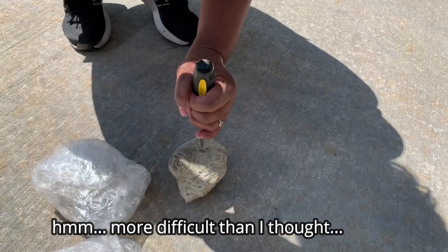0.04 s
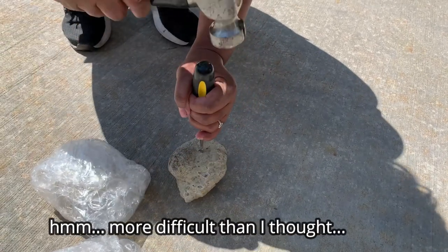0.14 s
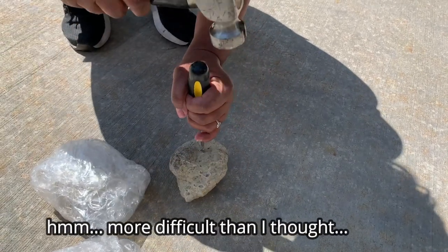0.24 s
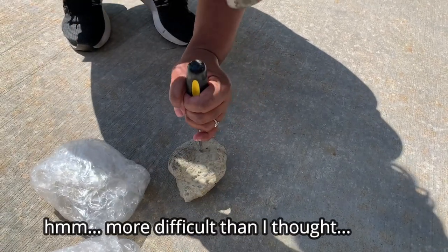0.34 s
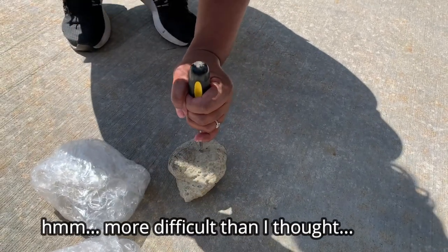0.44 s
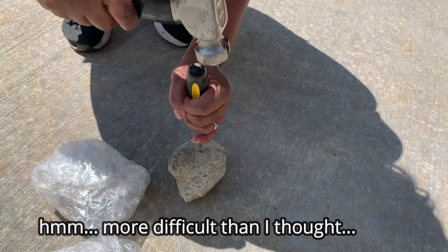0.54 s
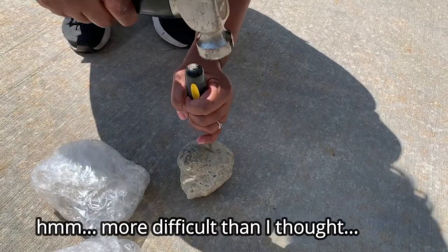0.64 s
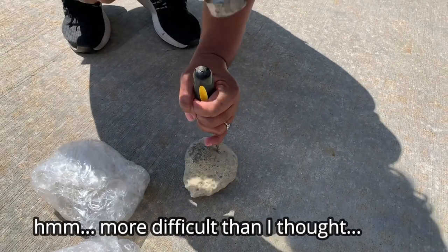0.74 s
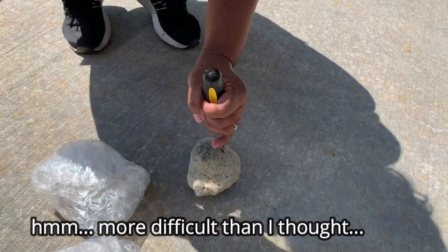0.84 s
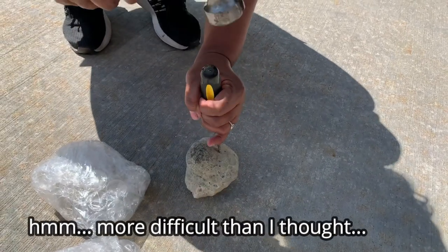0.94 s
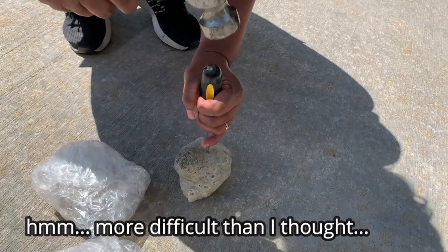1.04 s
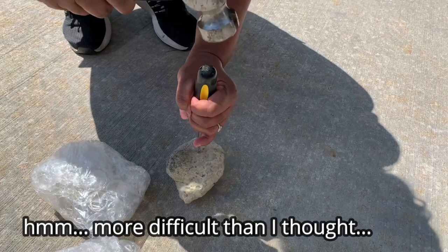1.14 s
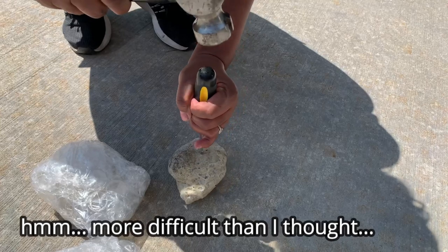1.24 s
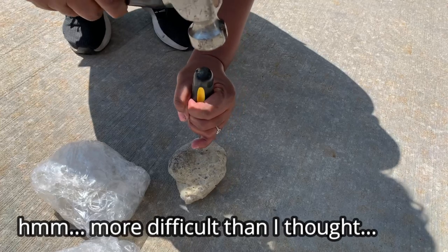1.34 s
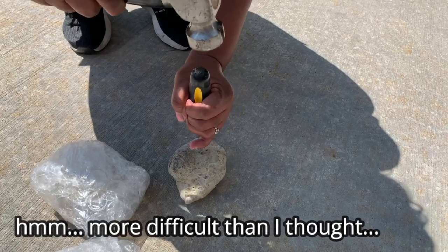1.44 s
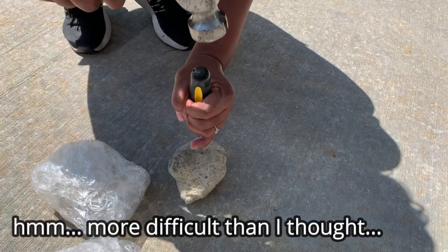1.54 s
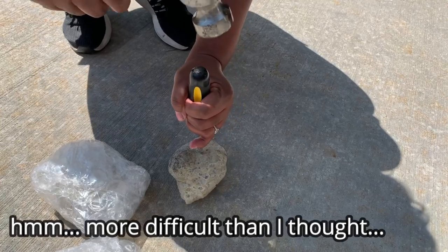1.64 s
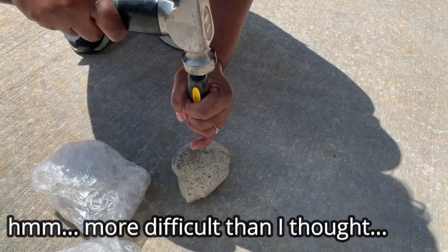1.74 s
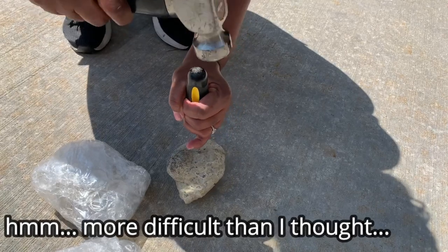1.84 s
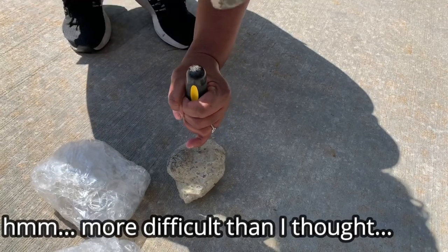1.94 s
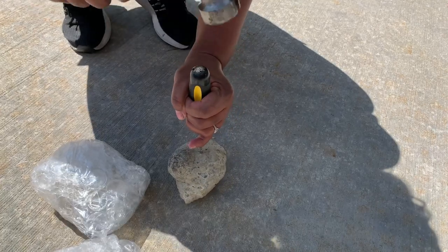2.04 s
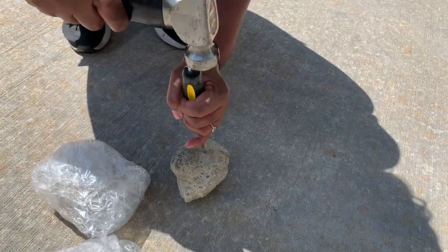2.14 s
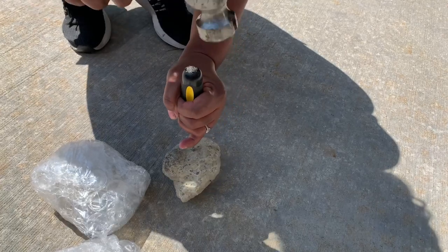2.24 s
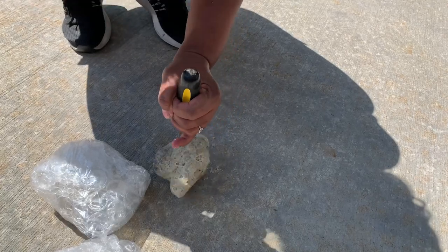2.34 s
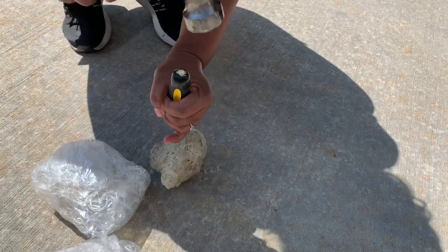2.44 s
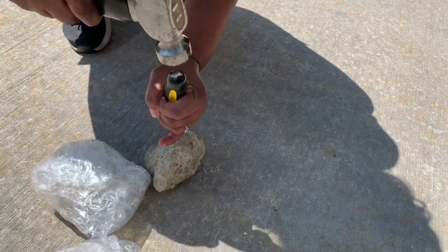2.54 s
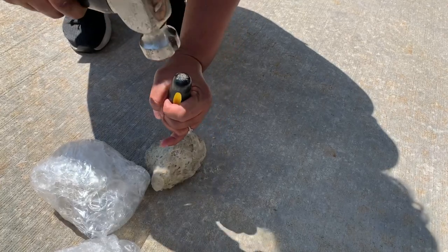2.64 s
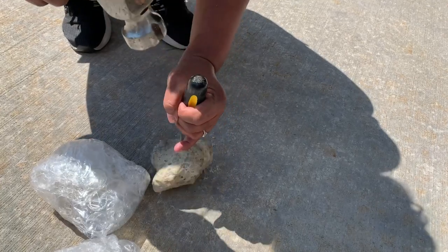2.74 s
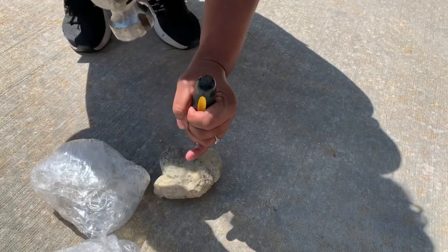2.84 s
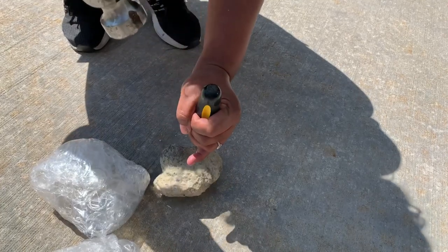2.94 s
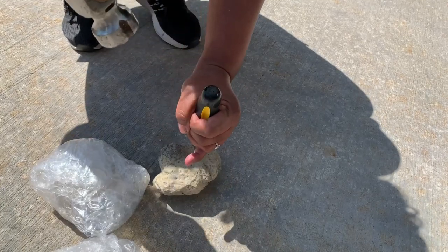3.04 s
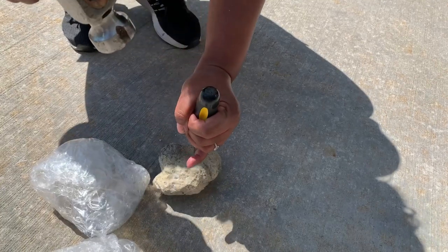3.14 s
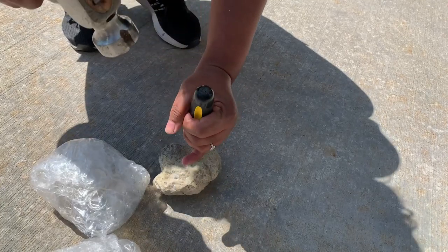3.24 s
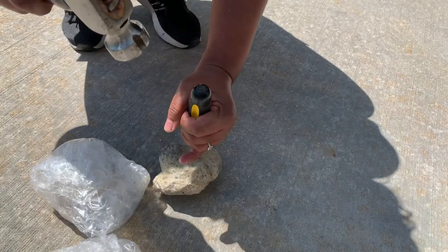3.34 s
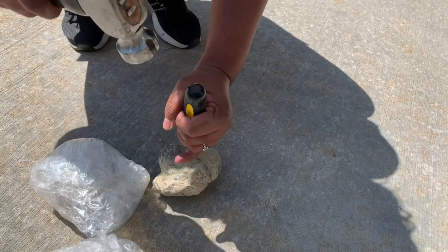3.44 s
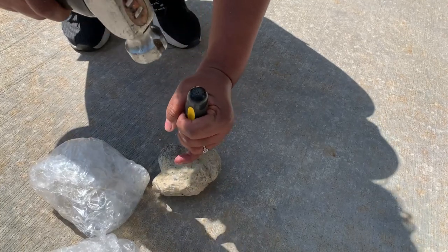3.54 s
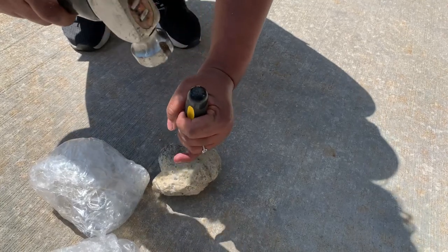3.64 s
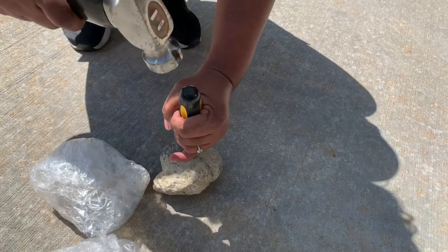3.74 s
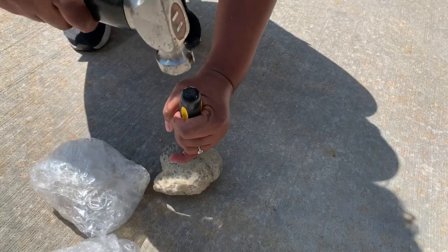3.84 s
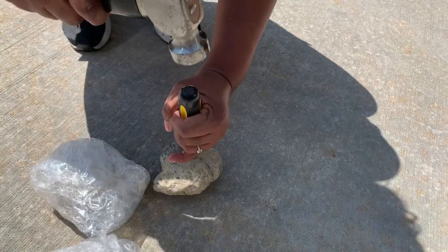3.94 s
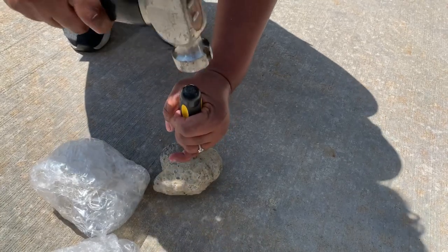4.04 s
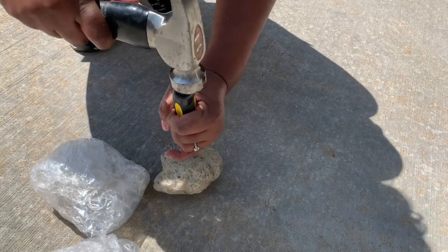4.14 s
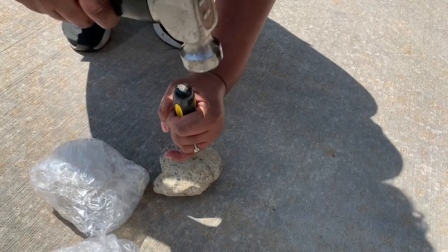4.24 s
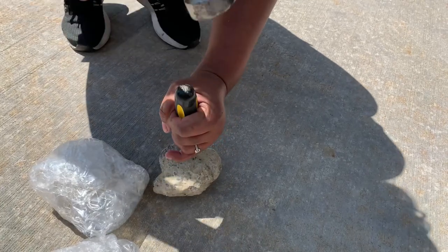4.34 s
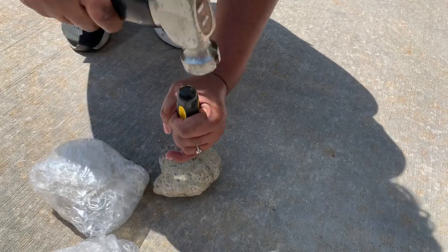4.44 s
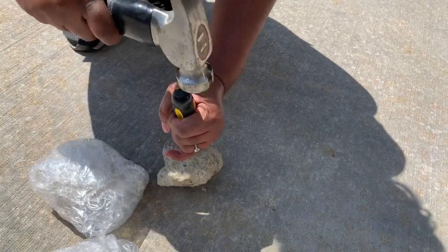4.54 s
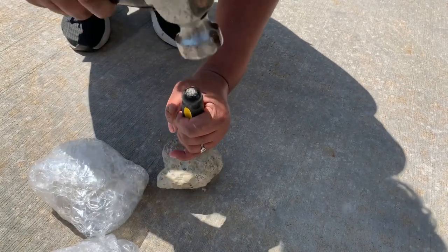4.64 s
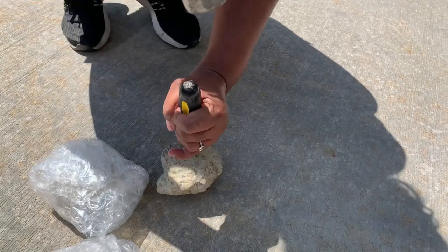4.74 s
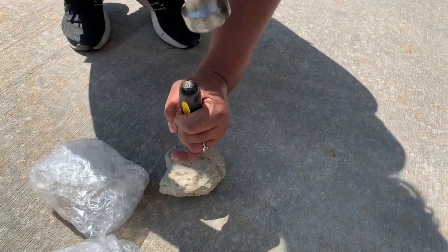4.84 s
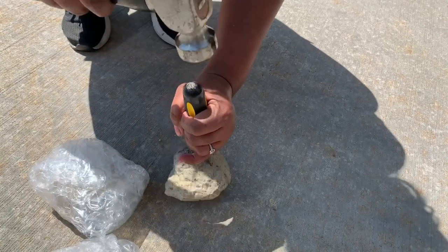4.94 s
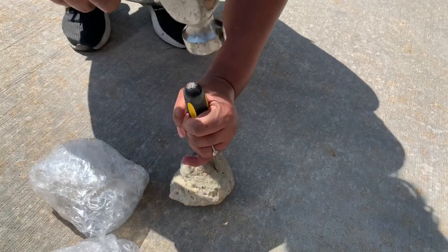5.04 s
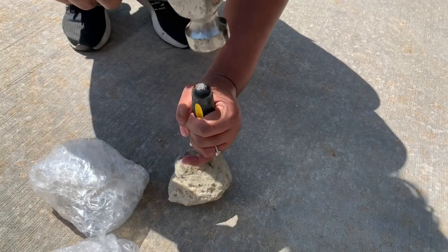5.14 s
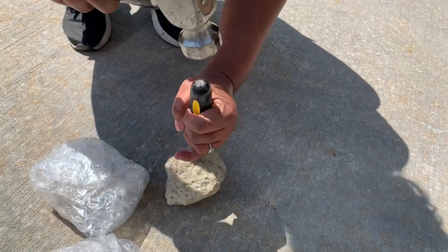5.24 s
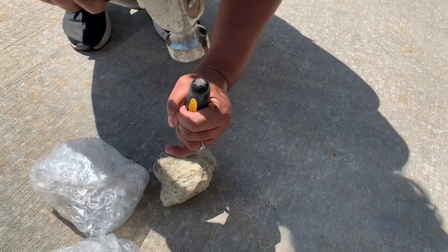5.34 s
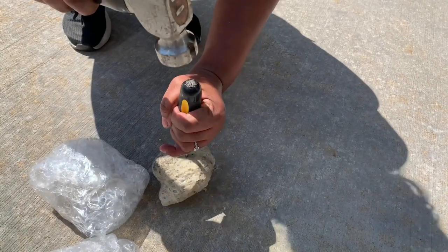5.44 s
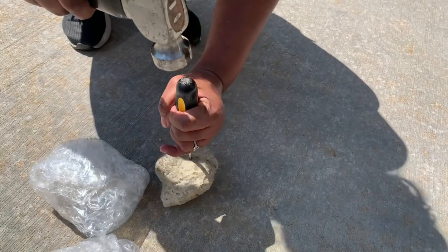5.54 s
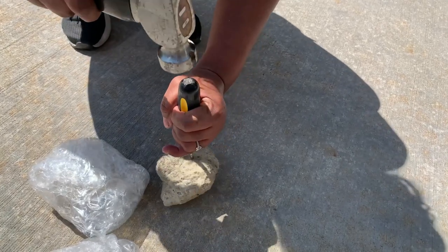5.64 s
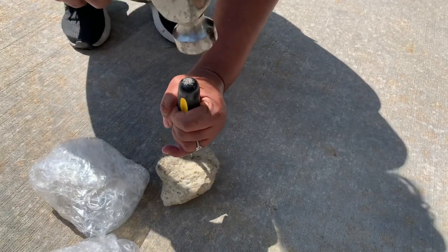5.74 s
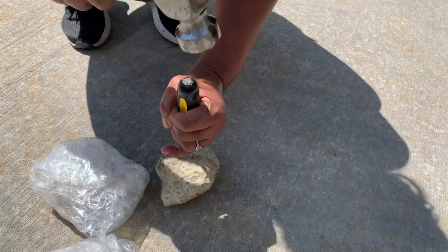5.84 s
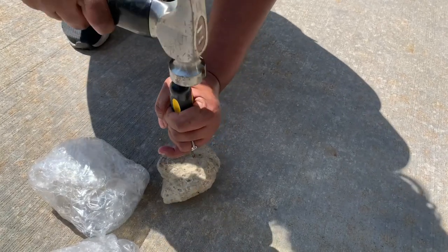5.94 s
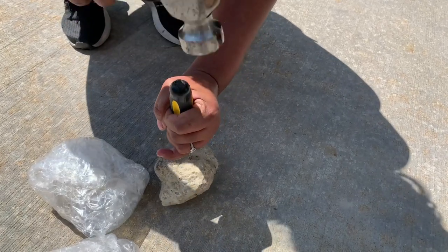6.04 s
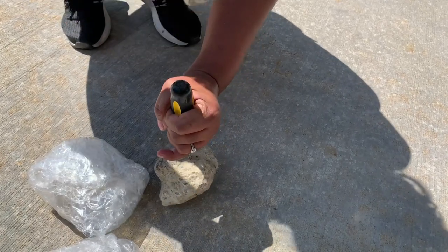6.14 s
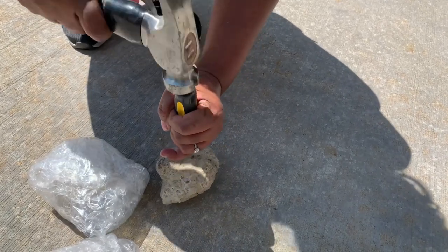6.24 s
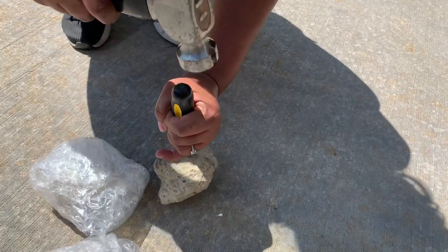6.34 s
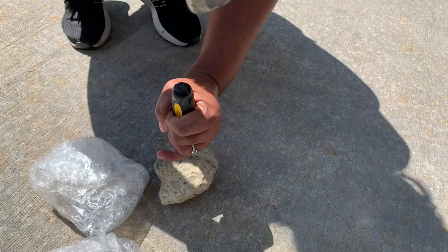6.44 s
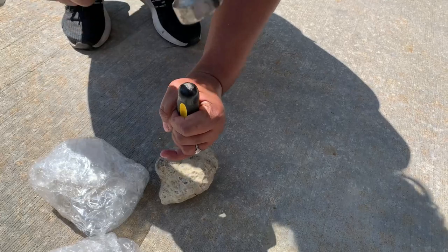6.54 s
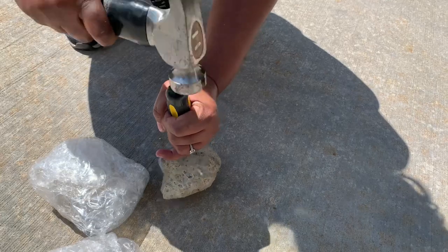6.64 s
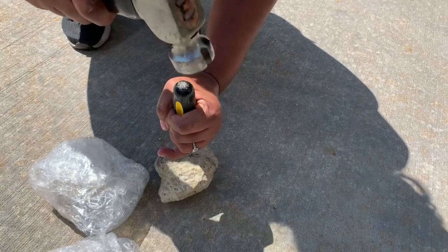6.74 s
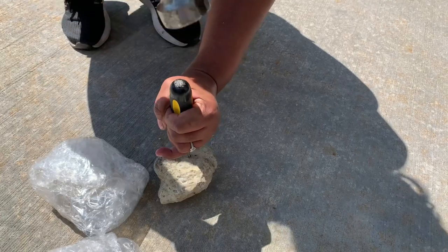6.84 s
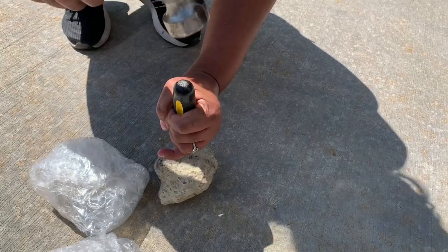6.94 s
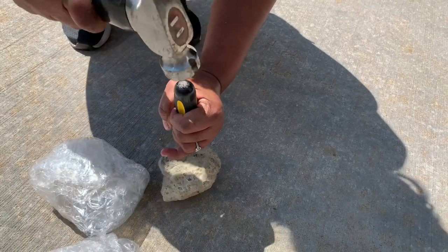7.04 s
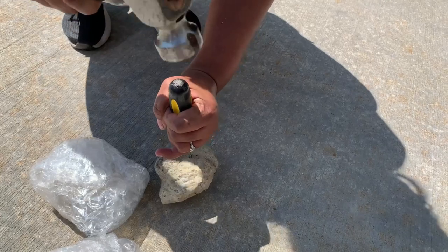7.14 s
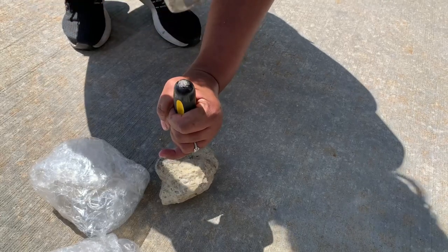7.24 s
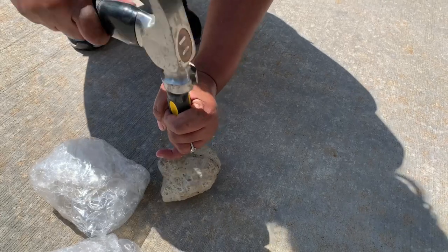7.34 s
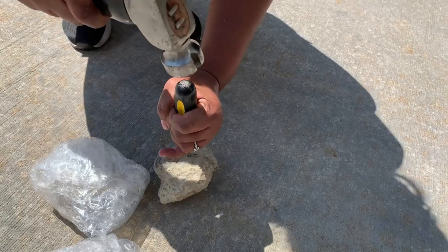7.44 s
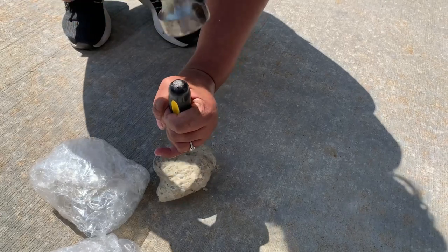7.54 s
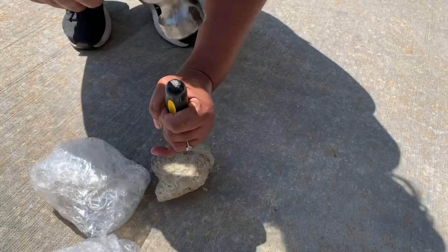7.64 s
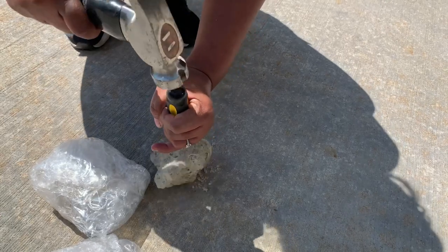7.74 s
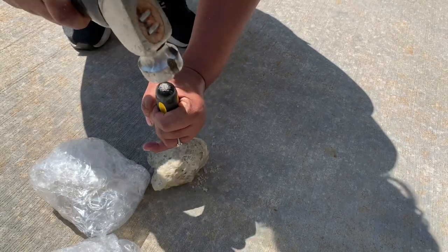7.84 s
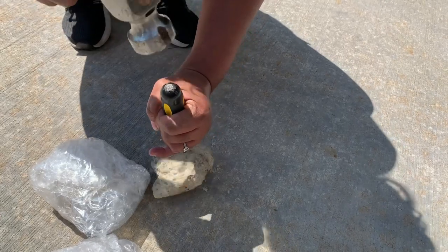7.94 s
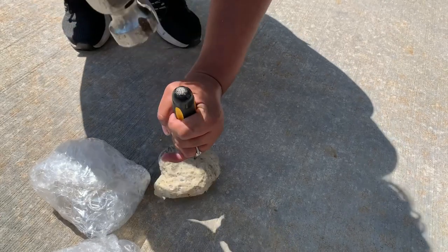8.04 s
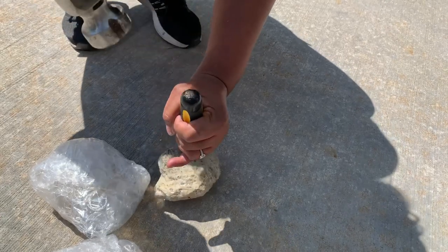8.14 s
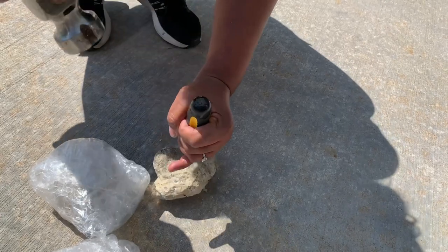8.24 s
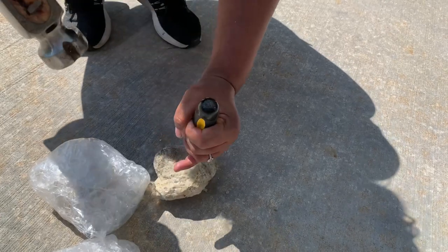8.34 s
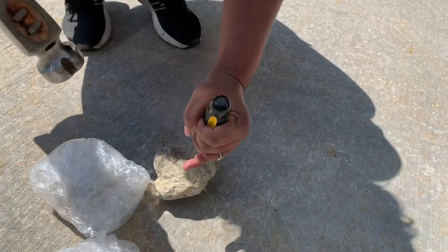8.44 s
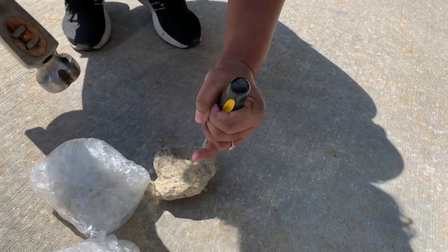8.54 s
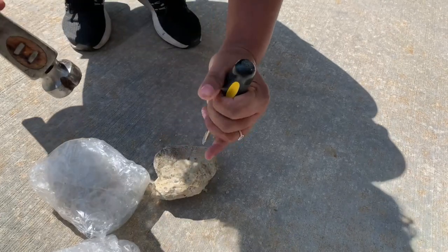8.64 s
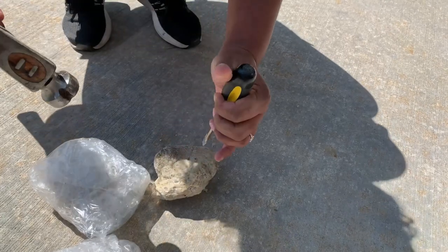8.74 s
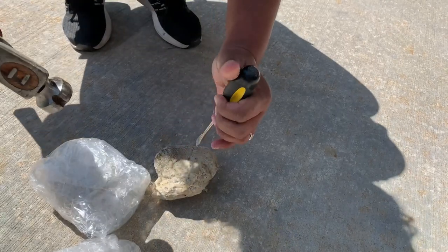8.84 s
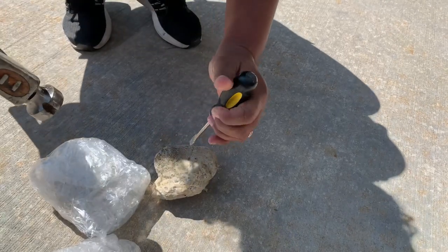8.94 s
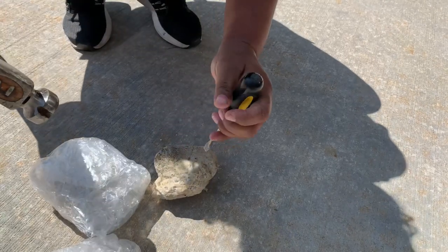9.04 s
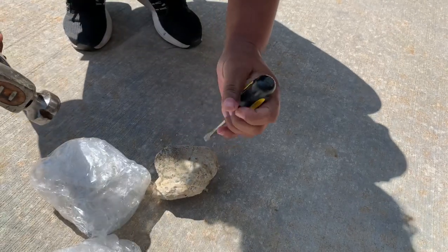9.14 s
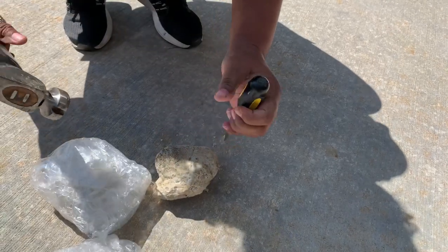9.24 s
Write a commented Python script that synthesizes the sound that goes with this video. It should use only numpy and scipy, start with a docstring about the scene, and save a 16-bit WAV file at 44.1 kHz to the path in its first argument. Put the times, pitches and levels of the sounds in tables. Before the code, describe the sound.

Hard hollow hammer knocks on a tool handle drive into stone in uneven runs, with gritty scraping, ticking crumbs and faint low hum outdoors.

```python
"""A hammer drives a screwdriver into a stone on a concrete slab, outdoors, in short runs of blows.
Each blow adds a burst of noise (crack) to damped tones (the handle's hollow knock, the stone's thud).
A faint steel tone rings on, thrown sand patters as random clicks and the yard answers in fading noise.
Between blows the tip grinds in dense clicks and hiss; crumbs tick and knock in short noise bursts.
Below lie the wavering tones of a far machine and the noise of open air."""
import sys
import numpy as np
from scipy import signal
from scipy.fft import rfft, irfft, next_fast_len
from scipy.io import wavfile
from scipy.ndimage import uniform_filter1d, map_coordinates

SR = 44100
rng = np.random.default_rng(int(sys.argv[2]) if len(sys.argv) > 2 else 0)


def generate_wav(sig):
    """Save sig (samples, or channels by samples) to the path in sys.argv[1] as 16-bit PCM at SR."""
    pcm = np.round(np.clip(np.atleast_2d(sig).T, -1, 1) * 32767).astype(np.int16)
    wavfile.write(sys.argv[1], SR, pcm)


N = 410118  # length of the scene in samples

# The hammer blows; all levels are relative, each part adds its own trim. Each row: start in seconds,
# strength in dB, squareness from 0 (glancing) to 1 (dead centre), crack in dB, steel ring in dB,
# thrown sand in dB, yard echo in dB.
BLOWS = [(-0.13, -9, .65, -25.5, -58.5, -46.5, -49), (0.2979, -13, .25, -27.5, -57.5, -51, -48.5),
         (0.6876, -14, .65, -24.5, -44.5, -46.5, -47), (1.8475, -14.5, .1, -32.5, -79.5, -56, -47.5),
         (2.2308, -12, .3, -19.5, -55.5, -45, -45), (4.239, -16, .1, -24, -69, -46, -58.5),
         (4.6003, -13, .12, -25, -65, -44.5, -46), (6.0466, -14, .02, -26.5, -72, -46, -48),
         (6.3794, -13, .72, -21.5, -60, -42, -45.5), (6.733, -13, 0.87, -19.5, -47, -45.5, -43),
         (7.0935, -14, 0.94, -20.5, -51.5, -47.5, -44), (7.4426, -13.5, .98, -18.5, -53, -45, -42),
         (7.7933, -14.5, 0.024, -21, -55.5, -53.5, -47)]
# The tip scraping as it is reseated and the stone rocks.
# Each row: start in seconds, length in seconds, relative grit level in dB.
SCRAPES = [(0.88, 0.072, -57.5), (1.114, 0.098, -62.5), (1.313, 0.016, -68), (2.438, 0.099, -54.5),
           (2.581, 0.067, -55), (2.673, 0.135, -66), (2.799, 0.098, -53.5), (2.966, .025, -62),
           (3.047, 0.092, -62.5), (3.21, 0.15, -76.5), (3.706, 0.19, -65.5), (3.962, 0.072, -68),
           (4.102, 0.045, -67), (4.853, 0.16, -65.5), (5.001, 0.25, -59), (5.323, .14, -62),
           (5.653, 0.031, -67), (8.041, 0.24, -66.5), (8.316, 0.034, -54.5), (8.682, 0.012, -73)]
# The colour of crushed grit. Each row: frequency in Hz, relative level in dB per Hz.
GRIT_COLOUR = [(300, -4), (1000, -12.5), (2300, -14), (3500, -4), (5500, -18.5), (7300, 7), (9000, 4),
               (11000, -1.5), (13000, 0.5), (16000, -6)]


def amp(db):
    """Turn decibels into a gain."""
    return 10 ** (np.asarray(db) / 20)


def unit(x):
    """Scale x to an rms of 1."""
    return x / np.sqrt(np.mean(x ** 2) + 1e-20)


def burst(x):
    """Scale x to the energy of a 10 ms sound with an rms of 1."""
    energy = np.mean(np.sum(x ** 2, -1))
    return x / np.sqrt(energy / (SR / 100) + 1e-20)


def fade(t, t60):
    """Die away exponentially, 60 dB down after t60 seconds."""
    return np.exp(-np.log(1000) * t / t60)


def along(points, hz):
    """Read a curve of (Hz, value) points on a logarithmic frequency axis."""
    f, v = np.transpose(points)
    return np.interp(np.log(hz + 1), np.log(f + 1), v)


def add(track, s, sound):
    """Mix a sound into the track at s seconds, cutting off what lies outside the track."""
    start = round(s * SR)
    part = sound[..., max(-start, 0):N - start]
    first = max(start, 0)
    track[..., first:first + part.shape[-1]] += part


def wobble(rate):
    """Draw a smooth random curve with this many random knots a second."""
    knots = rng.standard_normal(int(N * rate / SR) + 4)
    return map_coordinates(knots, [np.arange(N) * rate / SR])


def filtered(x, response):
    """Multiply the spectrum of x by a response that depends on frequency."""
    n = x.shape[-1]
    m = next_fast_len(n + 4096)
    return irfft(rfft(x, m) * response(np.fft.rfftfreq(m, 1 / SR)), m)[..., :n]


def noise(spectrum, size):
    """Make coloured noise with an rms of 1."""
    return unit(filtered(rng.standard_normal(size), lambda hz: amp(along(spectrum, hz))))


def diffuse(spectrum, size):
    """Stereo noise from all sides: alike in the bass, far less so in the treble."""
    # Each row: frequency in Hz, likeness of left and right from -1 (opposite) to 1 (same).
    likeness = [(60, 0.97), (130, 0.93), (290, .82), (640, -0.064), (1410, -0.46), (3100, 0.34),
                (15000, -0.34)]

    def mid_side(hz):
        turn = np.arccos(np.clip(along(likeness, hz), -1, 1)) / 2
        return np.array([np.cos(turn), np.sin(turn)])

    mid, side = filtered(noise(spectrum, (2, size)), mid_side)
    return unit(np.array([mid + side, mid - side]))


def ringing(modes, t, rise_cycles, detune, scatter_db):
    """One row per damped mode; each swells over its first cycles, neighbours swing in opposite senses."""
    hz, db, t60 = np.transpose(modes)[:, :, None]
    pitch, size = rng.standard_normal((2, len(modes), 1))
    cycles = hz * (1 + detune * pitch) * t
    sense = (-1) ** np.arange(len(modes))[:, None]
    swell = 1 - np.exp(-(cycles / rise_cycles) ** 2)
    return sense * amp(db + scatter_db * size) * swell * fade(t, t60) * np.sin(2 * np.pi * cycles)


def clicks(size, per_s, spread_db):
    """Random impulses of very uneven size, at random moments."""
    loudness = amp(spread_db * np.minimum(rng.exponential(size=size), 3))
    sizes = loudness * rng.choice([-1, 1], size)
    return sizes * (rng.random(size) < per_s / SR)


def by_aim(ends, square):
    """Blend a (glancing, square) pair of values by how square the blow is."""
    return np.interp(square, [0, 1], ends)


def ports(x):
    """Sound from the stone reaches the two microphone ports with its own level and phase."""
    # Each row: frequency in Hz, left minus right level in dB.
    level_gap = [(90, -2), (330, -0.5), (530, -2.5), (800, -1), (1300, 6.5), (1800, 8.5), (2300, -0.5),
                 (3500, -3), (5000, -21), (6500, -1.5), (15000, 0.5)]
    # Each row: frequency in Hz, phase in radians by which left leads.
    phase_lead = [(300, 0), (480, 0), (650, .9), (1000, .5), (2600, 1.5), (3400, 3), (4700, 3), (6200, 0),
                  (8600, -3.14), (11000, -6.2), (13600, -9.4), (16000, -12)]
    sides = np.array([[.5], [-.5]])

    def response(hz):
        gains = amp(sides * along(level_gap, hz))
        balanced = gains / np.sqrt(np.mean(gains ** 2, 0))
        return balanced * np.exp(1j * sides * along(phase_lead, hz))

    return filtered(x, response)


def background():
    """A far machine hums on slightly unsteady tones over the rumble of open air."""
    # The machine's tones. Each row: frequency in Hz, relative level in dB.
    hum_tones = [(54, -56.5), (120, -52), (161, -63), (240, -55), (360, -76.5)]
    # The colour of the open air. Each row: frequency in Hz, relative level in dB per Hz.
    air_colour = [(20, -30.5), (32, -22.5), (45, -10), (90, -5), (140, -8.5), (250, -17.5), (320, -26),
                  (600, -34), (1000, -33.5), (1800, -38.5), (3200, -51), (5000, -57.5), (10000, -55.5),
                  (16000, -57.5)]
    air_db = -48
    sink_from_s, sink_db_per_s = 7.79, 3  # from then on the background sinks
    t = np.arange(N) / SR

    def waver(hz):
        level = amp(1.3 * wobble(2))
        return level * np.sin(2 * np.pi * hz * t + .2 * wobble(2))

    hum = sum(amp(db) * waver(hz) for hz, db in hum_tones)
    lull = amp(-sink_db_per_s * np.maximum(t - sink_from_s, 0))
    return lull * (hum + amp(air_db) * diffuse(air_colour, N))


def yard(thud_db, echo_db, colour):
    """Close surfaces scatter a blow at once; far walls return a long, faint tail in the blow's colour."""
    # The far answer's colour. Each row: frequency in Hz, relative level in dB per Hz.
    far_colour = [(100, 2), (250, 7), (500, 0.5), (900, -7.5), (1300, 2), (2000, 0), (2700, -11),
                  (3900, -4.5), (5200, -19), (7200, -2.5), (10000, -27.5), (16000, -39.5)]
    # How long the far answer lingers. Each row: frequency in Hz, time to fall 60 dB in seconds
    # (the open sky shortens it further).
    far_t60 = [(150, 1.3), (600, 1), (1800, 1.1), (4000, 1.6), (7000, 0.11), (15000, 0.14)]
    # Scatter off legs and walls. Each row: frequency in Hz, relative level in dB per Hz.
    near_colour = [(100, 2), (300, 13), (500, 1.5), (900, -0.5), (1500, 1.5), (2600, -8), (4000, -10.5),
                   (7000, -24.5), (11000, -29), (16000, -38)]
    far_wall_s, far_wall_spread_s, far_wall_db = 0.93, .17, -7  # a late, soft answer from far off
    t = np.arange(SR) / SR
    near = diffuse(near_colour, len(t)) * (1 - np.exp(-t / .003)) * fade(t, .12)
    near = amp(thud_db - 9.5) * burst(near)

    # the blow's own colour is exaggerated 1.9 times
    wash = unit(filtered(diffuse(far_colour, len(t)), lambda hz: amp(1.9 * along(colour, hz))))
    # every frequency dies away at its own pace
    hz, when, z = signal.stft(wash, SR, nperseg=256)
    fading = z * fade(when, along(far_t60, hz)[:, None])
    tail = signal.istft(fading, SR, nperseg=256)[1][:, :len(t)]
    # with no roof above, the echoes thin out, apart from the far wall's late answer
    thinning = 1 / (1 + (t / 0.31) ** 4)
    far_wall = amp(far_wall_db) * np.exp(-((t - far_wall_s) / far_wall_spread_s) ** 2)
    onset = 1 - np.exp(-t / 0.0029)
    return near + amp(echo_db + 7.0) * tail * (thinning + far_wall) * onset


def steel(hz=6474, t60=0.76, swell_s=.04):
    """The hammer head sings on as a fading tone for up to a second, until the next blow stops it."""
    track, t = np.zeros(N), np.arange(SR) / SR
    waits = np.diff(np.transpose(BLOWS)[0], append=np.inf)
    for (s, *_, ring_db, _, _), wait in zip(BLOWS, waits):
        shape = (1 - np.exp(-t / swell_s)) * fade(t, t60) * (t < wait)
        add(track, s, amp(ring_db) * shape * np.sin(2 * np.pi * hz * t))
    return track


def spray():
    """Each blow throws sand that patters down on the slab as random clicks of falling strength."""
    # The colour of the sand. Each row: frequency in Hz, relative level in dB per Hz.
    sand_colour = [(1000, -19.5), (5000, -8), (7300, 4.5), (10000, 0.5), (13000, -7.5), (16000, -8.5)]
    track, t = np.zeros(N), np.arange(SR // 2) / SR
    for s, *_, sand_db, _ in BLOWS:
        grains = clicks(len(t), per_s=700, spread_db=5) * fade(t, 0.56)
        patter = burst(filtered(grains, lambda hz: amp(along(sand_colour, hz))))
        add(track, s + 0.017, amp(sand_db) * patter)
    return track


def grinding():
    """Sand crushes under the tip and the rocking stone: clumps of sharp clicks over a fine hiss."""
    attack_s, release_t60_s = 0.0068, .22
    pressure, t = np.zeros(N), np.arange(SR) / SR
    for s, length, db in SCRAPES:
        release = fade(np.maximum(t - length, 0), release_t60_s)
        add(pressure, s, amp(db) * np.minimum(t / attack_s, 1) * release)
    # the scraping is held below a set level; the sharpest ticks come from the chips
    pressure = np.minimum(pressure, amp(-50))

    # a fast random swing in level gathers the clicks into clumps
    grains = clicks(N, per_s=650, spread_db=5.5) * amp(3.5 * wobble(130))
    crushing = unit(filtered(grains, lambda hz: amp(along(GRIT_COLOUR, hz))))
    grit = crushing + .45 * noise(GRIT_COLOUR, N)
    # random patches in frequency and time give the clumps varied colours
    z = signal.stft(grit, nperseg=256)[2]
    patches = uniform_filter1d(rng.standard_normal(z.shape), size=6, axis=0)
    patches = unit(uniform_filter1d(patches, size=5, axis=1))
    grit = signal.istft(z * amp(3.5 * patches), nperseg=256)[1][:N]
    return amp(8.5) * pressure * unit(grit)


def crumbs():
    """Small crumbs roll at random moments of the scrapes, as rows like those of the chips."""
    per_s, most = 49, 12  # crumbs a second, and the most in one scrape
    knock_over_grit_db, usual_hz = 5.5, 1504  # before the chips' own level trims
    spread_db, spread_octaves = 1.5, 0.65
    rows = []
    for s, length, db in SCRAPES:
        when = rng.random(most)
        size, pitch = rng.standard_normal((2, most))
        delays = (np.arange(most) + when) / per_s
        level = db + spread_db * size
        knock_hz = usual_hz * 2 ** (spread_octaves * pitch)
        candidates = np.transpose([s + delays, level, level + knock_over_grit_db, knock_hz])
        rows += list(candidates[delays < length])
    return rows


def chips():
    """Each sound is a bright tick and a knock at its own pitch, both short bursts of noise."""
    # Larger crumbs ticking and knocking, a low knock of the rolling stone (2.8968), and short 2.2 kHz
    # squeaks of the last scrapes (from 8.192). Each row: start in seconds, relative tick level in dB,
    # relative knock level in dB, knock pitch in Hz.
    single_sounds = [(0.9083, -27, -54, 1260), (0.96, -45, -51, 1850), (1.1037, -42, -46, 1020),
                     (2.1046, -42, -66, 1540), (2.5012, -32, -43.5, 1050), (2.5771, -44, -49.5, 1190),
                     (2.5995, -24.5, -49, 1340), (2.7003, -25, -73, 1610), (2.821, -28, -43.5, 2773),
                     (2.865, -22, -45, 2547), (2.8968, -43, -40, 342), (2.96, -31.5, -47, 2330),
                     (3.6501, -32, -44, 2400), (3.8302, -33, -58, 1500), (3.8821, -35.5, -60.5, 1247),
                     (4.287, -34, -42, 1020), (5.0104, -37.5, -59, 1237), (5.222, -56, -53, 1730),
                     (8.192, -55, -52, 2126), (8.2174, -54, -43, 2184), (8.3249, -30.5, -53, 2094),
                     (8.3814, -55, -50, 2180)]
    # The colour of a knock. Each row: multiple of its pitch, relative level in dB per Hz.
    knock_colour = [(.25, -23), (.78, -23.5), (1, 0.5), (1.3, -11), (4, -15)]
    track, t = np.zeros(N), np.arange(SR // 12) / SR
    tick, knock = fade(t, .018), fade(t, .055)
    for s, db, knock_db, knock_hz in list(single_sounds) + crumbs():
        add(track, s, amp(db - 5.0) * noise(GRIT_COLOUR, len(t)) * tick)
        band = [(knock_hz * ratio, drop) for ratio, drop in knock_colour]
        add(track, s, amp(knock_db + 4.0) * noise(band, len(t)) * knock)
    return track


def blow(crack_db, thud_db, knock_db, clack_db, pitch):
    """Steel meets the handle with a noisy crack; the handle knocks and the stone thuds on the slab."""
    # The colour of the crack. Each row: frequency in Hz, relative level in dB per Hz.
    crack_colour = [(1500, -2.5), (3000, 6), (5000, -8), (6200, -6), (7300, 7), (9000, 1), (11000, -6),
                    (13000, -12.5), (16000, -19)]
    # Stone and fist against the slab.
    # Each row: usual frequency in Hz, relative level in dB, time to fall 60 dB in seconds.
    thud_modes = [(52, -22, 0.2), (94.3, -15, 0.14), (194, 6, 0.035), (294, -4, .047), (466, -5.5, 0.037),
                  (528, -8.5, 0.036), (661, -2.5, .02)]
    # Handle and shank, at pitch 1.
    # Each row: usual frequency in Hz, relative level in dB, time to fall 60 dB in seconds.
    handle_modes = [(1100, -8.5, .016), (1330, -1, .021), (1670, -2.5, .021), (2000, -1, .017),
                    (2540, -4.5, .011), (3600, -11, .009)]
    t = np.arange(SR // 4) / SR

    def late(x, s):
        return np.interp(t - s, t, x, left=0)

    crack = burst(noise(crack_colour, len(t)) * (1 - np.exp(-t / .0007)) * fade(t, 0.015))
    thud = -burst(ringing(thud_modes, t, rise_cycles=.9, detune=.007, scatter_db=.5).sum(0))
    # the lower handle modes take the knock's level, the upper ones the clack's
    weights = amp(np.interp(np.transpose(handle_modes)[0], [1380, 1620], [knock_db, clack_db]))
    # stretching time by the pitch shifts the tones and their decay together
    modes = ringing(handle_modes, pitch * t, rise_cycles=1.5, detune=.012, scatter_db=1.2)
    knock = np.hypot(amp(knock_db), amp(clack_db)) * burst(weights @ modes)
    # the knock comes back off the slab (upside down) and off a wall
    direct = amp(2.53) * late(knock, .0005)
    slab = amp(-11.5) * late(knock, 0.003)
    wall = amp(-20.0) * late(knock, .0175)
    return amp(crack_db - 1.5) * crack + amp(thud_db + .5) * late(thud, 0.00047) + direct - slab + wall


def blows(lead_db=-33, lead_crack_db=-4):
    """All blows, direct and echoed; a faint, duller tick runs just ahead of each."""
    # pairs are (glancing, square); a glancing blow knocks hollow, a square one mostly clacks
    knock_db, clack_db = (-4.5, -13), (-6, -6)  # relative to the strength
    handle_pitch = (0.94, 1.03)  # a square blow rings the handle slightly higher
    # echo treble in dB, and its change for each dB of harder crack, before the yard exaggerates both
    echo_bright_db, bright_per_crack, usual_crack_db = (-1.5, -8), .6, -26
    direct, echoes = np.zeros(N), np.zeros((2, N))
    _, strength, aim, hardness, *_ = np.transpose(BLOWS)
    knocks = strength + by_aim(knock_db, aim)
    clacks = strength + by_aim(clack_db, aim)
    levels = np.transpose([hardness, strength, knocks, clacks])
    for (s, thud_db, square, crack_db, *_, echo_db), parts in zip(BLOWS, levels):
        pitch = by_aim(handle_pitch, square)
        add(direct, s - .0005, blow(*parts, pitch))
        lead = blow(crack_db + lead_crack_db, *parts[1:], pitch)
        add(direct, s - .0118, amp(lead_db) * lead)
        # the echo takes on whatever sets this blow apart from the average one
        crack, thud, knock, clack = parts - levels.mean(0)
        bright = by_aim(echo_bright_db, square) + bright_per_crack * (crack_db - usual_crack_db)
        colour = [(600, thud), (1200, knock), (1900, clack), (3800, bright), (7000, crack)]
        add(echoes, s, yard(thud_db, echo_db, colour))
    return ports(direct) + echoes


def scene():
    """The background, the work at the stone and the yard's answer."""
    small_sounds = steel() + spray() + grinding() + chips()
    return background() + ports(small_sounds) + blows()


def record(dry, top=0.77):
    """The recorder rounds off the tallest peaks and cuts steeply above its band limit."""
    limit_hz = 16300
    rounded = dry / (1 + np.abs(dry / top) ** 6) ** (1 / 6)
    return filtered(rounded, lambda hz: 1 / (1 + (hz / limit_hz) ** 120))


dry = scene()
out = record(dry)
generate_wav(out)
```